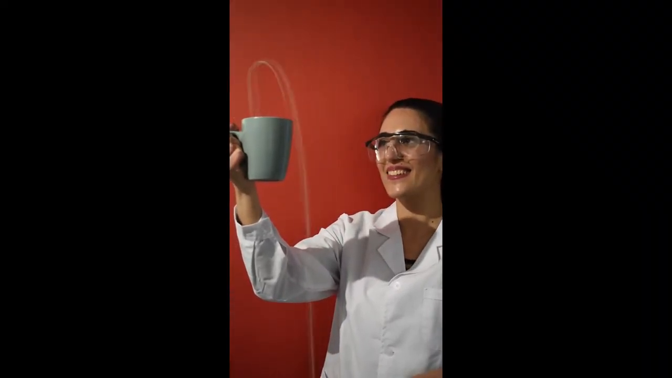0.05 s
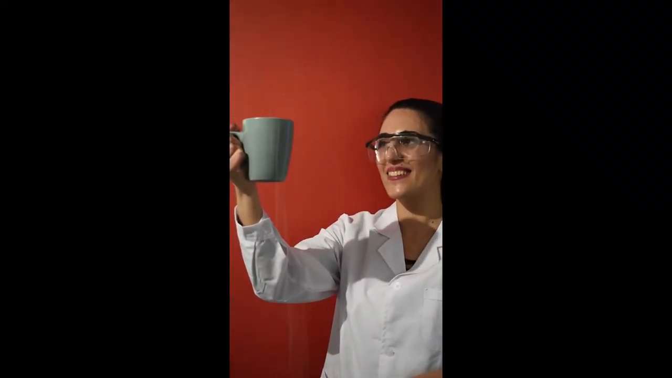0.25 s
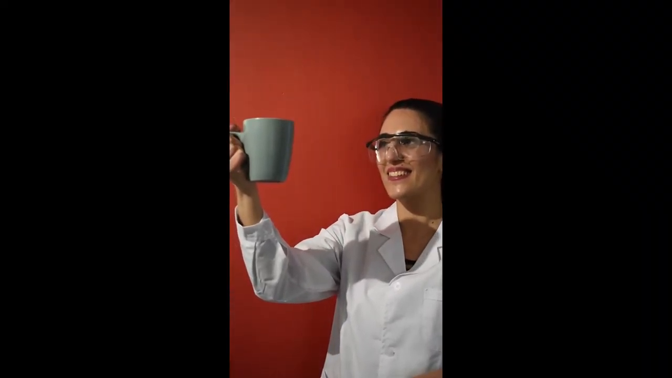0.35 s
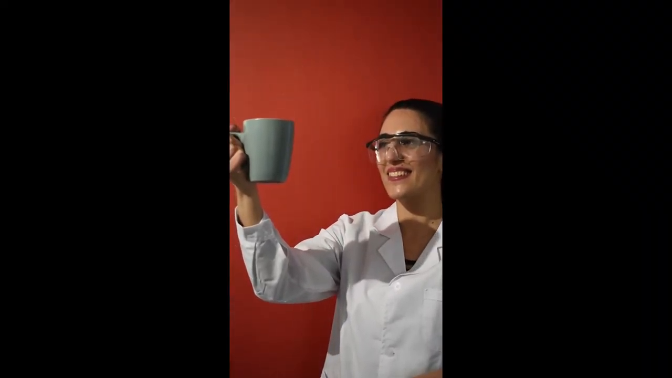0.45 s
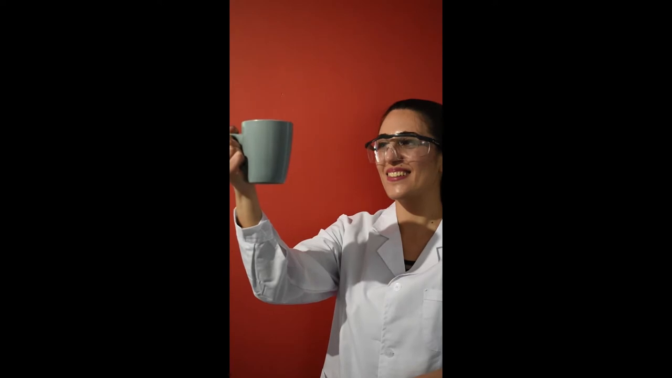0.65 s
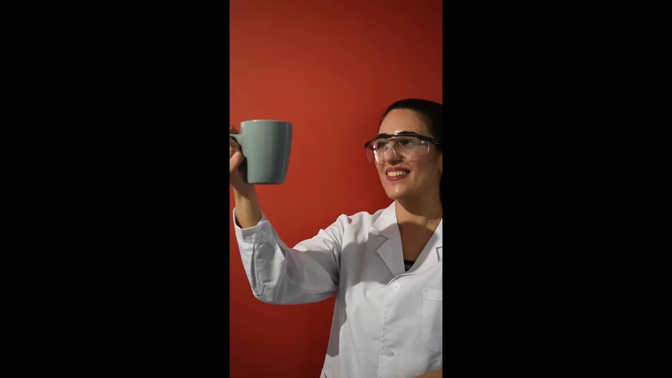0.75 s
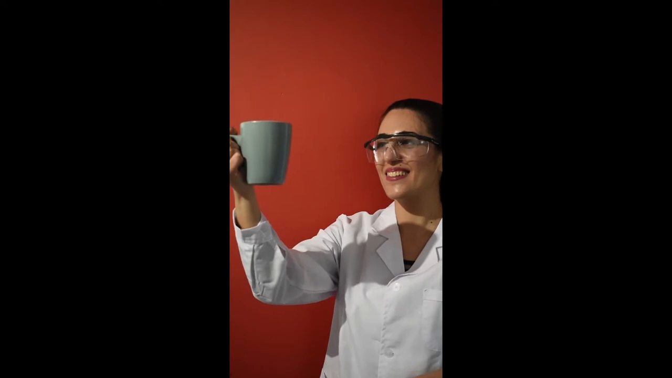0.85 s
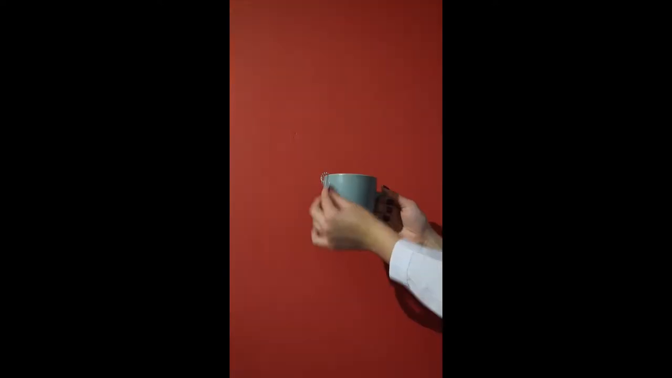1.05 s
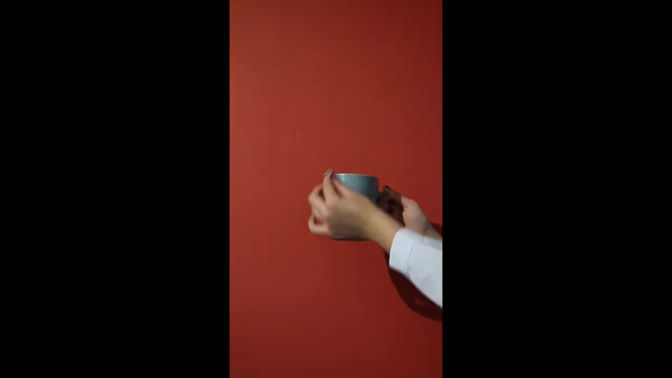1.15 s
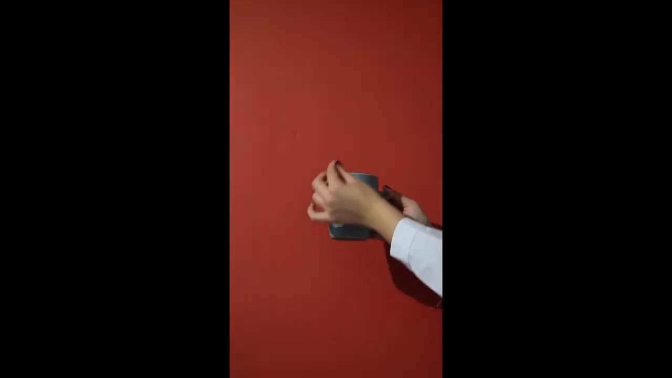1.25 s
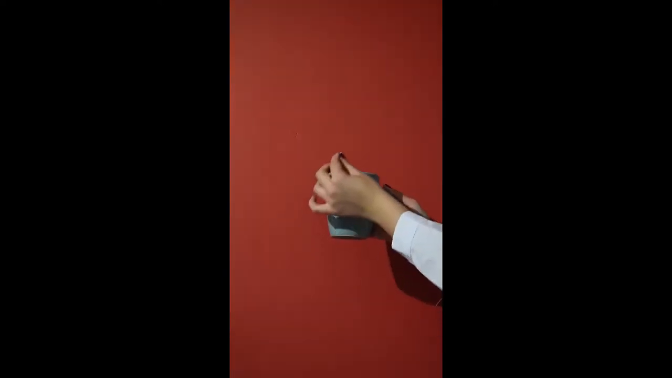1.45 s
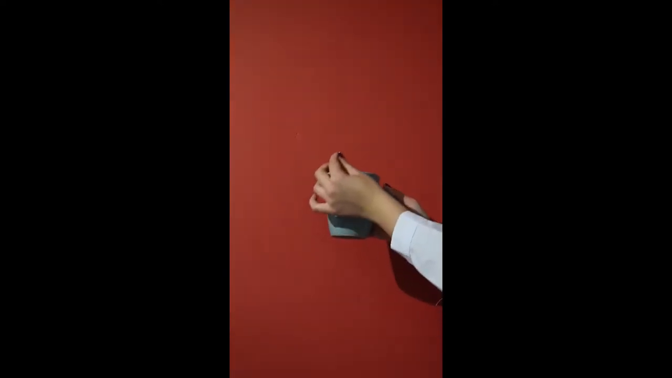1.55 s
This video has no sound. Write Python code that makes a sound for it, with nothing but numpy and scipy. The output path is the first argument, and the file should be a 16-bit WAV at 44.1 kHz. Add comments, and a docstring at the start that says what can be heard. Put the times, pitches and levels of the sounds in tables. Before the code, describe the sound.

A metal bead chain finishes running from a ceramic mug with a faint, uneven hiss until 0.2 s, a weak hollow note climbing beneath. At 0.2 s its tail clinks the rim and the mug rings briefly. From 0.4 to 0.5 s it lands in a dull rattling thud, flopping softly near 0.7. Room air dips out at 0.95; beads shift faintly around 1.15 and tick at 1.6.

```python
"""The last of a steel bead chain streams out of a ceramic mug: random bead contacts make the hiss and ringing.
Its tail whips the rim, and the empty mug rings as a set of fading tones; a faint hollow note climbs.
The tail lands on the floor in a rattling thud of dull noise and floor tones, then flops once more.
The level dips briefly; then beads shift softly in a filled mug held in both hands.
All this is heard in a small room with steady, quiet air noise."""
import sys
import numpy as np
from scipy import signal
from scipy.fft import rfft, irfft, next_fast_len
from scipy.io import wavfile
from scipy.ndimage import map_coordinates

SR = 44100
rng = np.random.default_rng(int(sys.argv[2]) if len(sys.argv) > 2 else 0)


def store_wav(level_fs):
    """Save 16-bit WAV to argv[1]."""
    pcm = np.round(np.clip(np.atleast_2d(level_fs), -1, 1) * 32767)
    wavfile.write(sys.argv[1], SR, pcm.T.astype(np.int16))


N = 70560  # length in samples

# ringing tones of the empty mug: f/Hz, level/dB, time to fall by 60 dB/s
MUG = [(832, -15, 0.168), (2382, 0.5, 0.1), (2416, 1.5, 0.13), (5694, -6.5, 0.12), (6437, -4.5, 0.14),
       (6535, -4.5, 0.21), (6800, -10, 0.12), (6660, -3.5, .19), (7290, -12, .16), (8660, -5.5, .15),
       (8800, -21.5, 0.18), (9243, -5.5, 0.17), (10932, 2, 0.066), (12050, -17.5, 0.13), (14200, -20, .22)]
# spectrum of bead against bead: f/Hz, level/dB
BEAD_COLOUR = [(1000, -33), (3000, -3), (4500, -6), (6500, -3), (8000, 1), (10000, -5.5), (13000, -14),
               (15800, -28.5)]


def stream():
    """The running chain hisses in uneven bunches; its beads ring and brush the mug."""
    # how the chain runs: t/s, hiss level/dB, level of the beads' high ring/dB
    run = [(0, -52, -51), (.012, -41.5, -52), (.035, -51, -54), (.09, -45, -60), (.12, -50, -47),
           (.158, -52.5, -48), (.19, -56.5, -57.5), (.25, -73, -90)]
    # spectrum of the hiss: f/Hz, level/dB
    hiss_colour = [(150, -8.5), (400, 2), (850, -1.5), (1400, -11.5), (5000, -9), (6300, -2), (8300, 0.5),
                   (8900, 4), (9700, -6), (12000, -6), (13500, -10.5), (15800, -21)]
    # ringing tones of the beads: f/Hz, level/dB, time to fall by 60 dB/s
    bead_tones = [(6400, -10.5, 0.13), (7780, -13, 0.094), (8860, -12, 0.076), (8770, -16, 0.073),
                  (9300, -16.5, .12), (12530, -3.5, 0.087), (12735, -1, 0.071), (12600, -3.5, 0.091)]
    bunches_per_s, bunch_db, rim_rub_db = 129, 2.6, -12.5

    running = clock() < run[-1][0]
    bunches = bunch_db * wobble(bunches_per_s)
    hiss_level, ring_level = amp(curves(run) + bunches) * running
    hiss = hiss_level * coloured(beads(), hiss_colour)
    bead_ring = rubbed(bead_tones, ring_level)
    mug_rub = amp(rim_rub_db) * rubbed(MUG, hiss_level)
    return hiss + bead_ring + mug_rub


def hollow():
    """A faint low note, a sine with a drifting phase, climbs while the mug empties."""
    # path of the note: t/s, pitch f/Hz, level/dB
    path = [(0, 371.3, -58), (.07, 396.3, -58.5), (.11, 486.5, -60), (.16, 629.3, -53), (.21, 648.6, -57),
            (.24, 823.6, -45.5), (.265, 781, -49), (.3, 770, -62.5), (.33, 784.5, -78)]
    hz, db = curves(path)
    note = unit(tone(hz, width_hz=38))
    return amp(db) * note * (clock() < path[-1][0])


def whip():
    """The tail strikes the rim, so beads clash and the mug rings; the free tail tinkles in the air."""
    # blows on the rim: t/s, mug ring level/dB, bead clash level/dB
    blows = [(.2045, -34, -29), (0.2115, -30.5, -23.5), (.221, -31.5, -20.5), (.24, -44.5, -28)]
    # spectrum of the clash: f/Hz, level/dB
    clash_colour = [(200, -18.5), (550, -15), (800, -16), (1100, -11), (1600, -27), (2200, -13),
                    (2400, 6.5), (2600, -8), (3500, -17), (5200, -15.5), (5700, -1.5), (6100, -9.5),
                    (6750, 3), (7400, -7), (7900, -2), (8400, -13), (8950, 2.5), (9700, -14.5),
                    (10950, -7.5), (11600, -11), (13400, -24.5), (15700, -24.5)]
    # spectrum of the tinkle: f/Hz, level/dB
    tinkle_colour = [(9000, -31), (13000, -10), (14500, -8), (15800, -11.5)]
    clash_rise_s, clash_t60_s = 0.0055, 0.053
    tinkle_db, tinkle_peak_s, tinkle_rise_s, tinkle_fall_s = -57, 0.26, 0.008, 0.04

    struck = np.zeros(N)
    for s, ring_db, clash_db in blows:
        mug_ring = ring(MUG, width_hz=14)
        clash = burst(clash_rise_s, clash_t60_s) * coloured(beads(), clash_colour)
        struck += at(s, amp(ring_db) * mug_ring + amp(clash_db) * clash)

    tinkle_level = amp(tinkle_db) * swell(tinkle_peak_s, tinkle_rise_s, tinkle_fall_s)
    tinkle = tinkle_level * coloured(beads(), tinkle_colour)
    return low_cut(struck, 230) + tinkle


def landing():
    """Loops of chain drum on the floor as noise thuds and ringing tones; the last, softer blows are duller."""
    # blows on the floor: t/s, level/dB, dullness/dB per octave above the pivot
    blows = [(0.4019, -28, -4), (.408, -24.5, -4), (.413, -19.5, 1), (.428, -21, -2.5), (.443, -17.5, 1.5),
             (.452, -18.5, 5), (.461, -18, 1.5), (.476, -21, 6), (.488, -23, 3.5), (0.513, -34, 1.5),
             (0.663, -42.5, 15), (.67, -39, 14.5), (.69, -36, 17), (.724, -44, 27.5)]
    # ringing tones of the floor: f/Hz, level/dB, time to fall by 60 dB/s
    floor_tones = [(222, -13, 0.22), (321.6, -2, 0.079), (344.6, -1.5, 0.14), (426.8, 1.5, 0.16),
                   (534, -4.5, 0.058), (559, 3.5, 0.07), (643, -3, 0.21), (763, -11.5, 0.3),
                   (802, -10.5, 0.124), (938.3, 1, 0.12)]
    # spectrum of the thud: f/Hz, level/dB
    thud_colour = [(50, -38), (130, -24), (235, -20.5), (340, 3.5), (600, -1), (1000, -4.5), (1700, -9),
                   (2600, -23), (3300, -37), (6000, -63)]
    thud_rise_s, thud_t60_s, floor_ring_db, pivot_hz = 0.0037, 0.075, -7, 450

    out = np.zeros(N)
    for s, db, dull_db in blows:
        def tilt(hz):
            """Treble change in dB at a frequency for this blow."""
            return -dull_db * np.log2(np.maximum(hz / pivot_hz, 1))

        colour = [(hz, level + tilt(hz)) for hz, level in thud_colour]
        thud = coloured(rng.standard_normal(N), colour) * fall(thud_t60_s)
        tones = [(hz, level + tilt(hz), t60) for hz, level, t60 in floor_tones]
        floor_ring = amp(floor_ring_db) * ring(tones, width_hz=2.5)
        soft_start = 1 - fall(thud_rise_s)
        out += at(s, amp(db) * (thud + floor_ring) * soft_start)
    return low_cut(out, 156)


def clatter():
    """Beads hit each other as they land, in bright bursts of random contacts."""
    # bursts: t/s, level/dB, rise/s, time to fall by 60 dB/s, brightness limit f/Hz
    bursts = [(0.4039, -31.5, 0.0009, 0.0099, 7500), (0.407, -32, 0.0016, 0.021, 7070),
              (0.411, -36.5, 0.0027, 0.058, 7190), (0.422, -49, 0.0034, 0.023, 7800),
              (.463, -52.5, 0.0301, 0.077, 14000), (0.475, -39.5, 0.017, 0.14, 13800)]
    out = np.zeros(N)
    for s, db, rise, t60, top_hz in bursts:
        def soften(hz):
            """Gain that falls off smoothly above the brightness limit."""
            return 1 / np.sqrt(1 + (hz / top_hz) ** 8)

        rattle = filtered(coloured(beads(), BEAD_COLOUR), soften)
        out += at(s, amp(db) * burst(rise, t60) * rattle)
    return out


def shifting():
    """Beads slide in the filled mug, whose ring is short because the hands damp it."""
    # slides: time of the peak t/s, level/dB, rise/s, fall/s
    slides = [(1.11, -65.5, 0.019, 0.025), (1.167, -53, .015, .036), (1.594, -44.5, 0.0036, 0.045)]
    # ringing tones of the held mug: f/Hz, level/dB, time to fall by 60 dB/s
    held_tones = [(2286, 3, 0.068), (5660, 0, 0.051), (6250, -9.5, 0.045), (6770, -3.5, 0.071),
                  (7220, -5.5, 0.035), (7720, -8, 0.046), (11050, -15, 0.04), (11130, -13, .04)]
    hiss_db = -8
    level = sum(amp(db) * swell(s, rise, decay) for s, db, rise, decay in slides)
    hiss = amp(hiss_db) * level * coloured(beads(), BEAD_COLOUR)
    return rubbed(held_tones, level) + hiss


def in_room(x, wet_db):
    """Add the room's echoes: a tail of noise that dies at a different speed in each pitch range."""
    # how long the room rings: f/Hz, time to fall by 60 dB/s
    room_t60 = [(150, 0.67), (500, 0.31), (2000, 0.56), (7000, .4), (14000, 0.29)]
    hz, t, z = signal.stft(rng.standard_normal(SR // 2), SR, nperseg=256)
    decay = np.exp(-np.log(1000) * t / along(room_t60, hz)[:, None])
    tail = signal.istft(z * decay, SR, nperseg=256)[1]
    echoes = signal.fftconvolve(x, tail / np.linalg.norm(tail))[:N]
    return x + amp(wet_db) * at(.005, echoes)


def air():
    """The room's steady air is quiet noise, stronger in the low range."""
    # spectrum of the air: f/Hz, level/dB
    air_colour = [(15, -28), (25, -15), (110, -1.5), (299, -3.5), (352, -3), (654, -6.5), (729, -7),
                  (834, -5.5), (1430, -11), (2260, -14.5), (4330, -18.5), (12700, -30), (15800, -38)]
    return amp(-58) * coloured(rng.standard_normal(N), air_colour)


def beads():
    """A dense random train of bead contacts, each a single click of either sign."""
    per_s, scatter_db = 6000, 1
    hits = rng.random(N) < per_s / SR
    strengths = amp(scatter_db * rng.standard_normal(N))
    return unit(hits * rng.choice([-1, 1], N) * strengths)


def rubbed(modes, level):
    """Bead contacts of a given level keep a body's tones ringing."""
    body = ring(modes)
    return signal.fftconvolve(beads() * level, body / np.linalg.norm(body))[:N]


def ring(modes, width_hz=0, scatter_db=1.5):
    """A struck body sounds as fading tones, their levels a little different each time."""
    out = np.zeros(N)
    for hz, db, t60 in modes:
        level = amp(db + scatter_db * rng.standard_normal())
        out += level * fall(t60) * tone(hz, width_hz)
    return out


def tone(hz, width_hz):
    """A sine whose phase drifts at random, which spreads its pitch over a width."""
    drift = np.sqrt(2 * np.pi * abs(width_hz) / SR) * rng.standard_normal(N)
    steps = 2 * np.pi * hz / SR + drift
    return np.sin(2 * np.pi * rng.random() + np.cumsum(steps))


def coloured(x, colour):
    """Shape x with a spectrum of (Hz, dB) points, then scale it to rms 1."""
    return unit(filtered(x, lambda hz: amp(along(colour, hz))))


def filtered(x, response):
    """Multiply the spectrum of x by a gain that depends on frequency."""
    m = next_fast_len(N + SR // 2)
    hz = np.fft.rfftfreq(m, 1 / SR)
    return irfft(rfft(x, m) * response(hz), m)[:N]


def low_cut(x, hz):
    """Remove the bass below a given frequency."""
    return signal.sosfilt(signal.butter(4, hz, 'highpass', fs=SR, output='sos'), x)


def fall(t60):
    """Exponential decay that drops 60 dB in t60 seconds."""
    return np.exp(-np.log(1000) * clock() / t60)


def burst(rise, t60):
    """A quick rise, then a decay."""
    return (1 - fall(rise)) * fall(t60)


def swell(s, rise, decay):
    """A level that grows up to time s and dies away."""
    return np.exp(-np.maximum((s - clock()) / rise, (clock() - s) / decay))


def wobble(rate):
    """A smooth random curve through a given number of random points a second."""
    return map_coordinates(rng.standard_normal(N // 10), [clock() * rate])


def curves(rows):
    """One value per sample for each column after the time."""
    s, *cols = np.transpose(rows)
    return [np.interp(clock(), s, c) for c in cols]


def along(points, hz):
    """Read (Hz, value) points at any frequency, on a log axis."""
    f, v = np.transpose(points)
    return np.interp(np.log(hz + 1), np.log(f + 1), v)


def at(s, x):
    """Delay x to start at s seconds."""
    return np.pad(x, (max(0, round(s * SR)), 0))[:N]


def amp(db):
    """Turn decibels into a gain."""
    return 10 ** (np.asarray(db) / 20)


def unit(x):
    """Scale to rms 1."""
    return x / np.sqrt(np.mean(x ** 2) + 1e-20)


def clock():
    """Time of each sample in seconds."""
    return np.arange(N) / SR


def scene():
    """Mix the mug and floor sounds, each with room echoes, and the steady air."""
    mug = in_room(stream() + hollow() + whip() + shifting(), wet_db=-8.5)
    floor = in_room(landing(), wet_db=-13.5) + in_room(clatter(), wet_db=-13.5)
    return (mug + floor + air())[None]


def record(dry):
    """The level dips briefly and comes back; nothing passes above the band limit."""
    dip_s, half_width_s, power, depth_db, top_hz = 0.95, 0.034, 1.85, -39, 15850
    fade = np.minimum(np.abs(clock() - dip_s) / half_width_s, 1) ** power
    gain = fade + amp(depth_db) * (1 - fade)
    return filtered(dry[0] * gain, lambda hz: hz < top_hz)[None]


dry = scene()
out = record(dry)
store_wav(out)
```